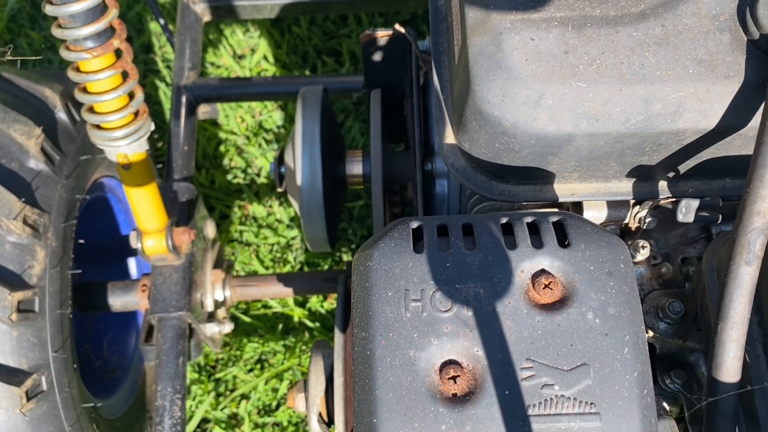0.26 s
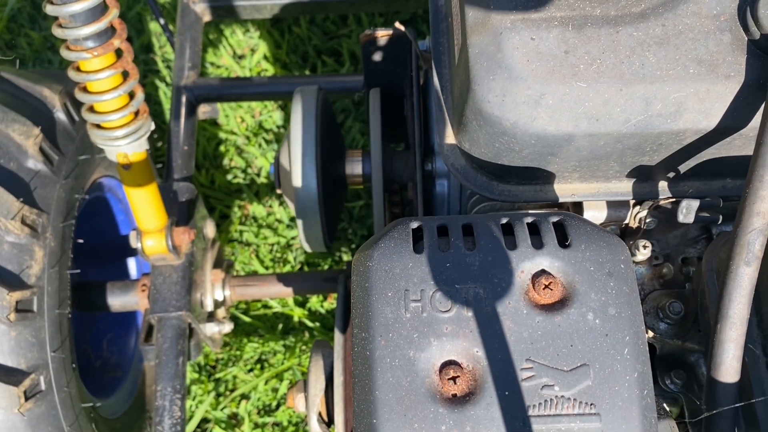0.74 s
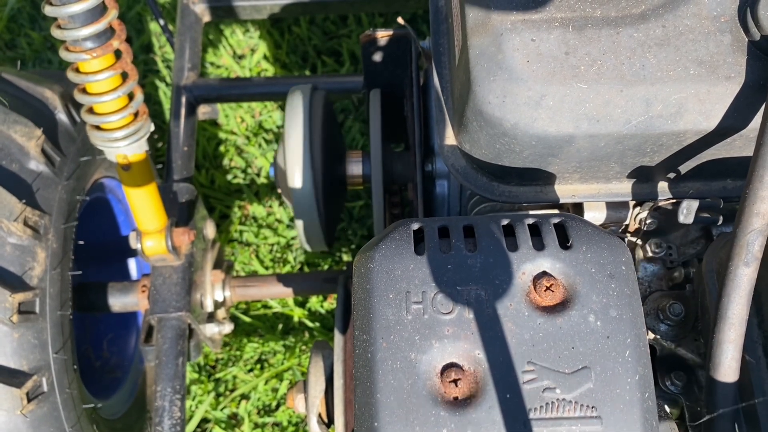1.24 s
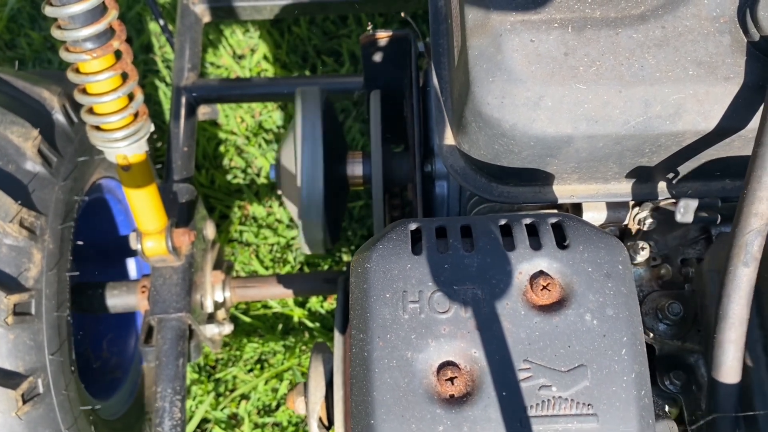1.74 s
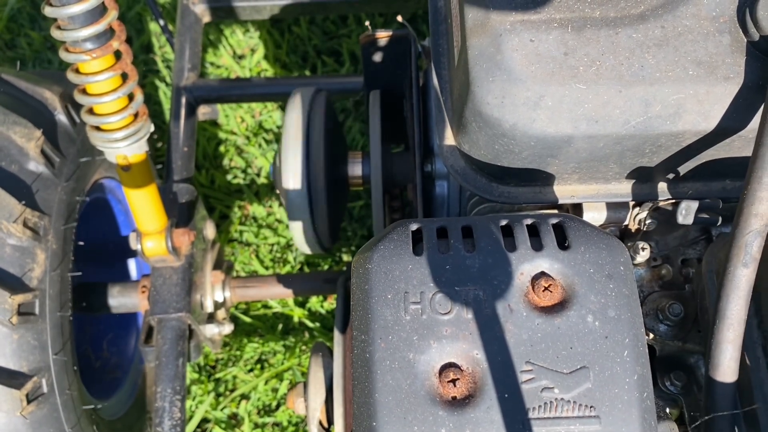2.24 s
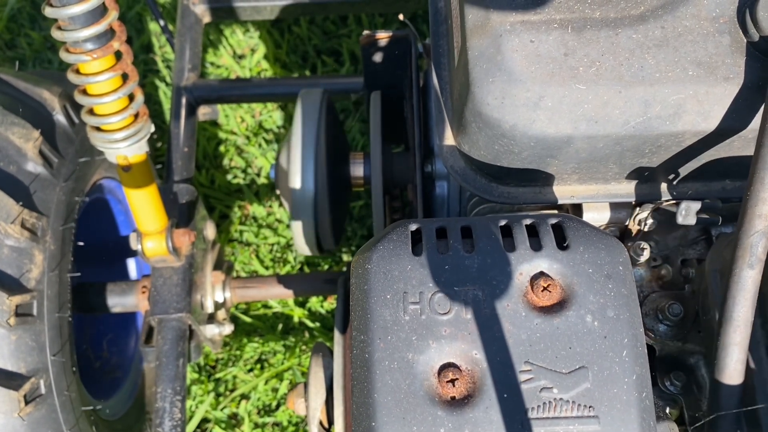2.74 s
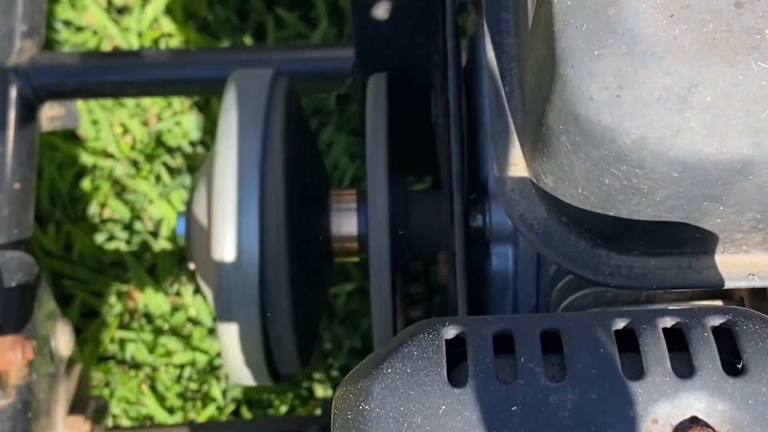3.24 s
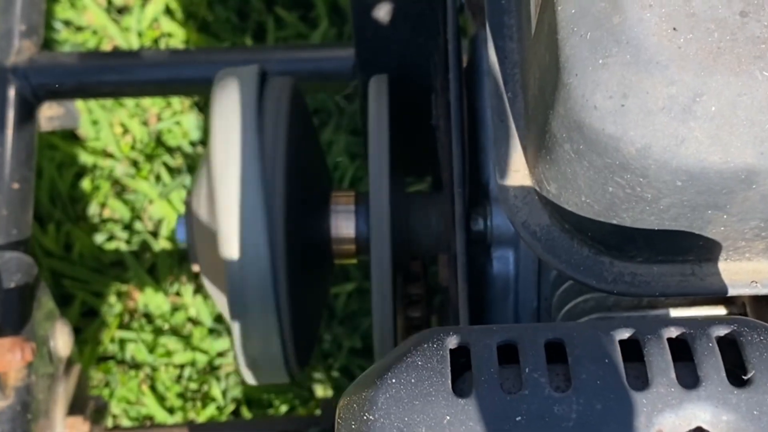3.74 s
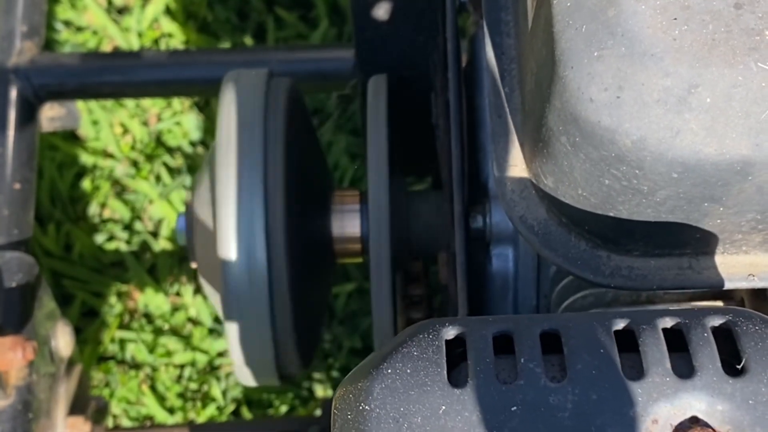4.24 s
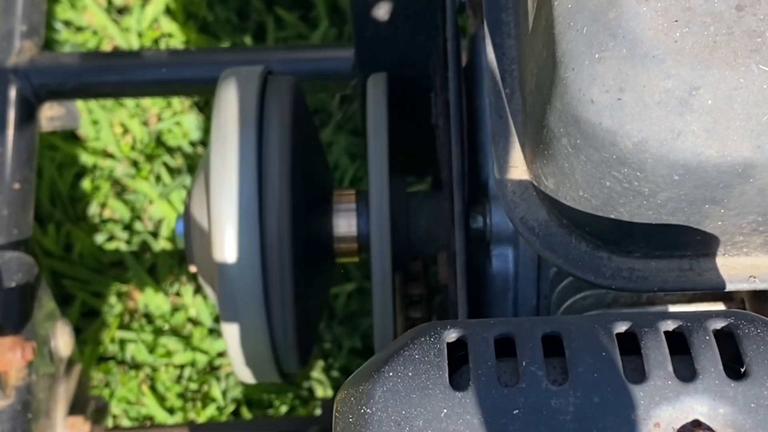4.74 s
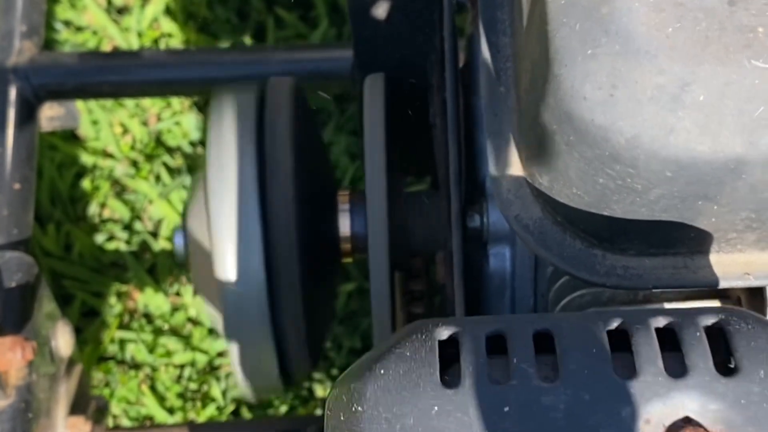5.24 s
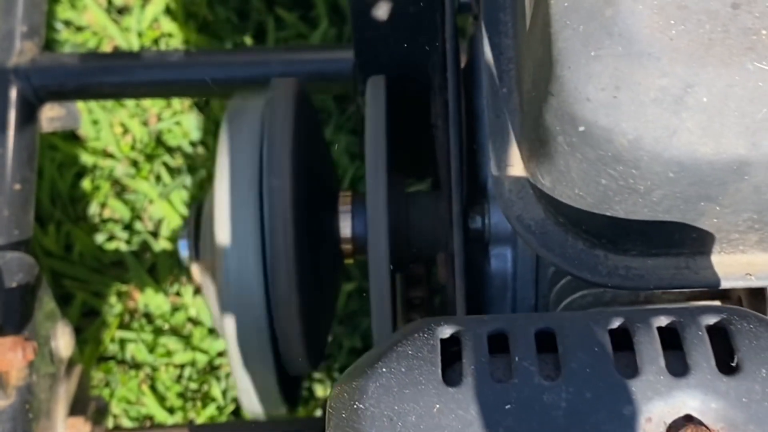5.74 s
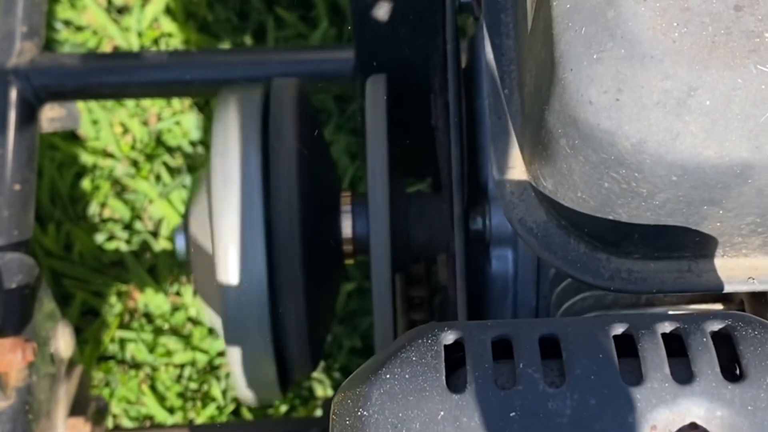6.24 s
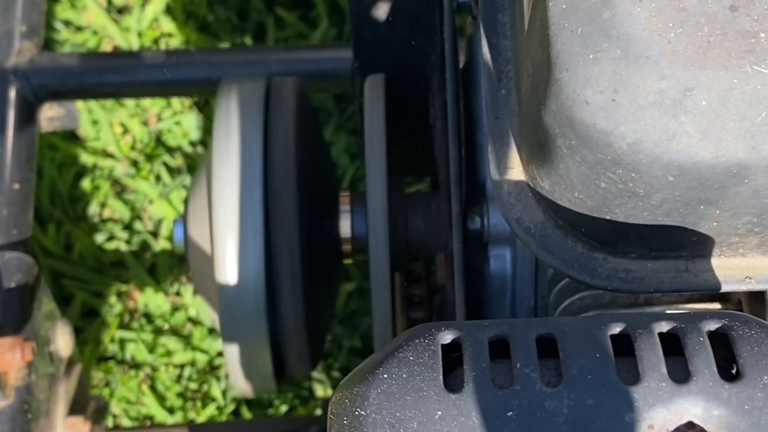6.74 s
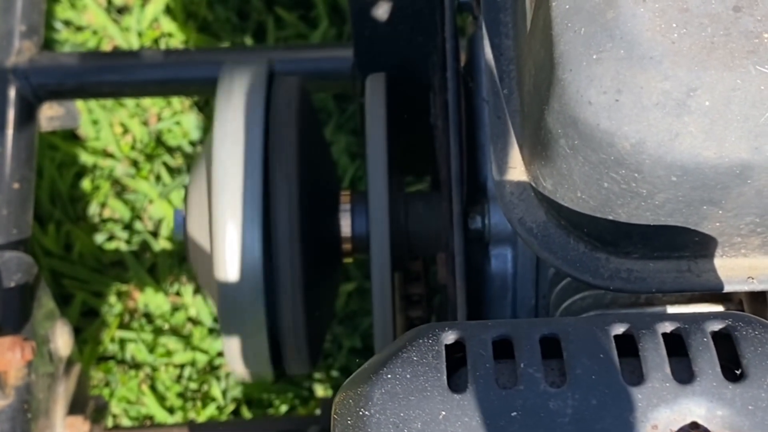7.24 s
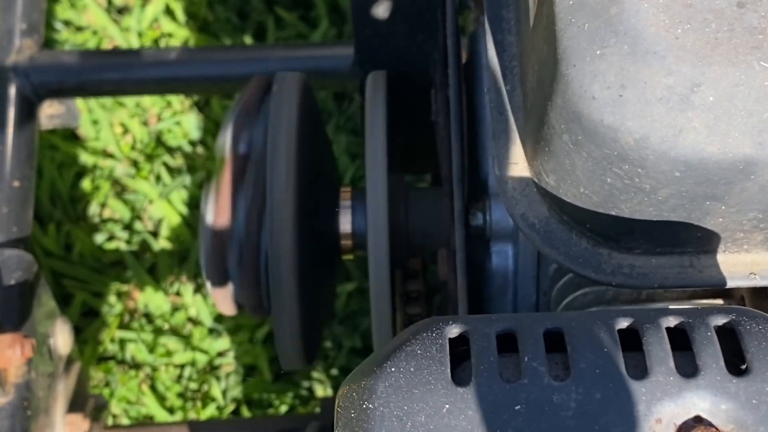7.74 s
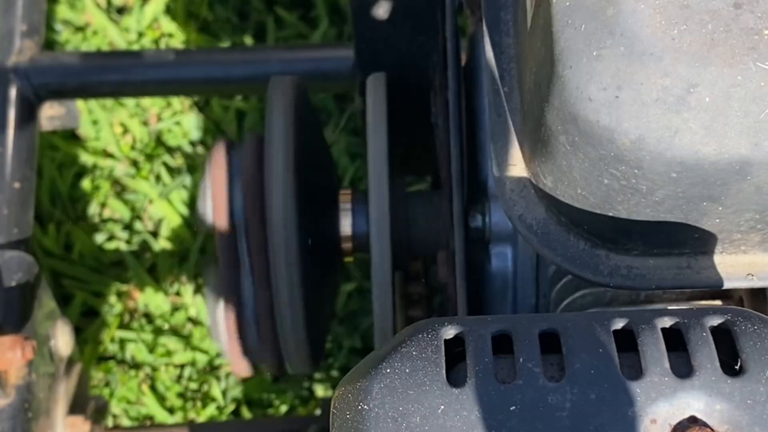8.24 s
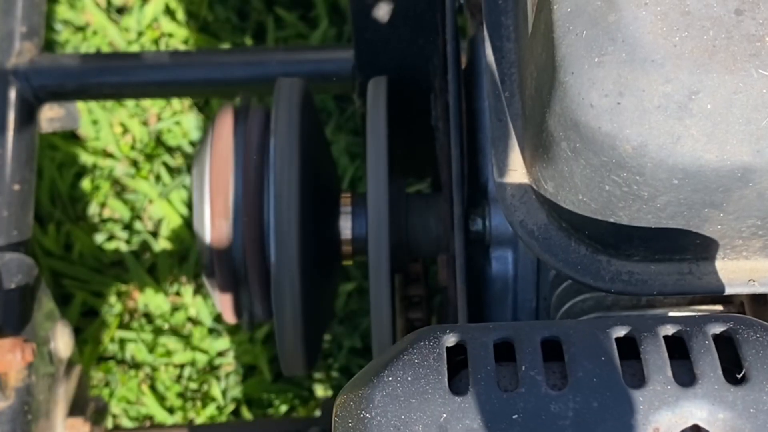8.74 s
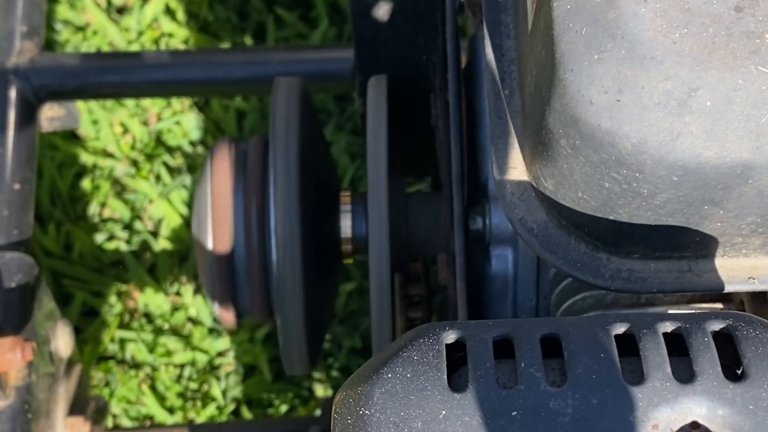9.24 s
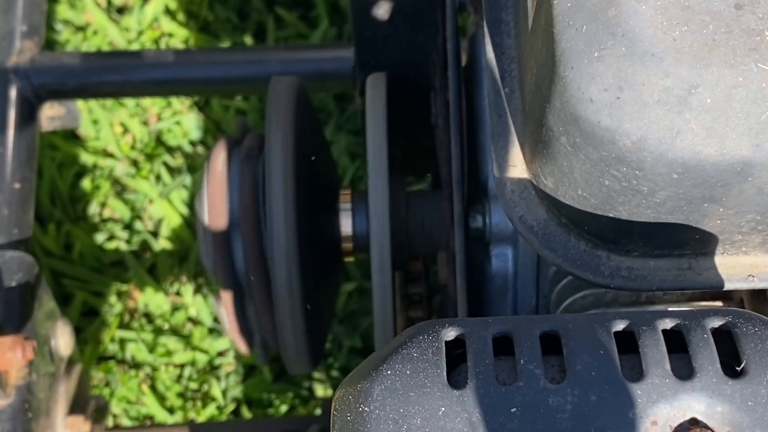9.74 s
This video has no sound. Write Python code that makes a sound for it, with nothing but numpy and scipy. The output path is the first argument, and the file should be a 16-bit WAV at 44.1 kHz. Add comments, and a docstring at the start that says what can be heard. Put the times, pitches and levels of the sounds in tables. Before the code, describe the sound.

Close beside a small single-cylinder engine outdoors, dull valve clatter and low gas thumps run throughout. Uneven barks and pops lift it into several brief surges, each sliding down as a rough drone and growl. Around five seconds the clutch crashes and scrapes; at six a cluster of hollow knocks rattles. A final rev near seven and a half brings squealing steel, then a lumpy, quieter idle. Dry stereo, slightly stronger left.

```python
"""Go-kart engine idle and surges

A small four-stroke single idles, missing many firings; several times it runs up to speed and coasts back.
Gas: swept pulses from the valves and firings, filtered turbulence, low orders that merge into a drone.
Clutch on the crank end: filtered noise bursts for clatter, rattle and knocks, damped or wavering tones for
ringing, squeal and growl. One crank-speed curve times the cyclic layers; tables place the single events."""
import sys
import numpy as np
from scipy import signal
from scipy.fft import rfft, irfft, next_fast_len
from scipy.io import wavfile
from scipy.ndimage import uniform_filter1d

SR = 44100
rng = np.random.default_rng(int(sys.argv[2]) if len(sys.argv) > 2 else 0)


def transcribe(u):
    """Save the signal u as a 16-bit wav file named by the first command-line argument.

    u: samples, shape (n,) or (channels, n), limited to [-1, 1]; the rate is SR.
    q: integer samples, one column per channel.
    """
    v = np.clip(np.atleast_2d(u).T, -1, 1)
    q = np.round(v * 32767).astype(np.int16)
    wavfile.write(sys.argv[1], SR, q)


N = 440559
T = np.arange(N) / SR

# Event and spectrum levels are relative; each layer adds its own trim.

# Crank speed in working cycles (two turns) per second. Surges: start t/s, run-up/s, top speed f/Hz
SURGES = [(.66, .07, 18.33), (1.02, .09, 18.39), (1.19, .14, 26.95), (2.46, .24, 25.67), (3.63, .16, 25.86),
          (4.74, .27, 29.78), (7.29, .22, 24.31)]
COLD_IDLE_HZ, IDLE_HZ, FIRST_CYCLE_S = 14.218, 14.565, .063
# Coast: time to lose the last 1 Hz of excess speed, power law of the decay
COAST_S, COAST_POWER = 1.192, 3.2
# Dragging clutch lets go at this speed; softness; extra level of thump, gas, clatter, rattle
RELEASE_HZ, RELEASE_WIDTH_HZ, DRAG_DB = 20.3, 0.14, [1.5, -0.5, 1.5, 4]
# Shudder ahead of release: speed, width of its range, extra rattle
SHUDDER_HZ, SHUDDER_WIDTH_HZ, SHUDDER_DB = 21.23, 1, 3

# Slow drift of the layers at idle speed: t/s, thump level/dB, gas level/dB, clatter level/dB, rattle level/dB
LAYER_DRIFT = [(0, -24, -25.5, -29.5, -49), (.6, -24, -28.5, -29, -46), (.88, -25.5, -30, -34.5, -51.5),
               (1.15, -20.5, -27, -29.5, -50), (1.45, -29.5, -32, -34, -51.5), (2.1, -25.5, -29, -34, -52),
               (2.9, -26, -28, -31.5, -48.5), (4.5, -25, -29.5, -33, -51.5), (4.98, -23.5, -29, -28.5, -45),
               (5.148, -33.5, -28.5, -30, -42), (5.75, -29, -30.5, -32, -46), (6.4, -33, -33, -36.5, -52),
               (7.099, -29.5, -32.5, -35.5, -50.5), (7.7, -26, -27.5, -33, -51),
               (8.2, -28.5, -31, -36.5, -55.5), (8.648, -30, -34, -38, -54.5),
               (9.99, -29.5, -36, -37.5, -52.5)]
# Change of thump, gas, clatter, rattle with speed: slope/(dB/Hz)
SPEED_SLOPE_DB_PER_HZ = [-0.093, 0.17, -0.2, 0.14]
THUMP, GAS, CLATTER, RATTLE = range(4)

# Runs of firings, and two single clutch crashes (5.04, 7.56 s):
# first t/s, last t/s, spacing/cycles, exhaust bark level/dB, clutch clash level/dB
FIRINGS_AND_CRASHES = [(.113, .538, 2, -12, -29), (0.68, .68, 1, -7, -16), (.742, .742, 1, -14.5, -28),
                       (0.971, .972, 1, -14, -30), (1.194, 1.29, 1, -8.5, -17.5),
                       (2.544, 2.636, 1, -9.5, -18.5), (3.645, 3.742, 1, -8, -18),
                       (4.801, 4.97, 1, -10, -18.5), (5.042, 5.044, 1, -30, -19),
                       (7.382, 7.482, 1, -15.5, -20), (7.56, 7.559, 1, -15.5, -20),
                       (8.8, 9.884, 2, -21, -41)]
# Weakening within a run, dB per Hz of speed gained
BARK_SAG_DB_PER_HZ, CLASH_SAG_DB_PER_HZ = 1.2, 0.25
# Weak firings that only chuff: t/s
CHUFFS_S = [2.201, 2.375, 2.495, 6.346, 6.467, 6.594, 6.722, 6.852, 6.981, 7.114, 7.249, 8.307, 8.424, 8.61]
# Single gas pops, mostly of missing cycles: t/s, level/dB
POPS = [(0.339, -13), (0.591, -8), (7.296, -14), (0.662, -10), (0.921, -13), (1.087, -8), (1.147, -12),
        (3.37, -11.5), (8.307, -13.5)]
# Pops ahead of the first two firings of a run of three or more, one cycle apart
POP_LEAD_S, POP_DB = 0.01, -8
# Coasting thumps that drop out: t/s
DROPOUTS_S = [1.765, 2.995, 3.135, 4.055, 4.19, 5.31, 5.435, 5.57, 5.66, 5.76]
# Gas strokes: level/dB, rise/s, length/s
BLOW, SUCK, GULP = (0, 0.0025, 0.036), (-0.15, 0.0046, 0.033), (-3.5, 0.0044, 0.021)
# Their pitch sweep: start above the end pitch, end pitch, time for the excess to halve
SWEEP_HZ, SWEEP_END_HZ, SWEEP_S = 800, 33, .00103
# Drone orders at speed: multiple of the cycle rate/1, level/dB
DRONE = [(2, 1), (3, 3.5), (4, 3), (5, -11)]

# Clutch against its stop: t/s, steel crack level/dB, hollow drum level/dB
KNOCKS = [(0.765, -15, -26), (1.091, -19.5, -22), (1.1483, -23, -21), (2.109, -11.5, -29),
          (2.378, -38, -10), (3.477, -9.5, -13), (4.581, -8, -27), (5.028, -46, -49.5), (6.015, -24, -10),
          (6.041, -27, -5), (6.071, -32, -6.5), (6.092, -21, -3), (6.119, -26, -6), (6.146, -16.5, -6),
          (6.173, -41, -9), (6.275, -13, -15), (7.621, -14, -27), (8.2503, -24.5, -25), (8.303, -19, -11.5)]
# Steel squeals: t/s, leading pitch f/Hz, length/s, level/dB
SQUEALS = [(0.703, 5200, 0.05, -21.5), (0.767, 4980, 0.02, -17), (7.445, 5020, 0.02, -13.5),
           (7.471, 4900, 0.034, -27), (7.5, 4960, 0.046, -23.5), (7.547, 5100, 0.047, -26),
           (7.584, 5010, 0.026, -26), (7.623, 3340, 0.052, -23), (7.618, 6040, .06, -30.5),
           (7.625, 5550, 0.051, -25), (7.663, 5950, 0.054, -27)]
# Steel modes that ring along with a squeal: f/Hz, level/dB
SQUEAL_MODES = [(4950, -13), (6065, -9), (7540, -11.5), (10560, -10), (14640, -11)]
# Scraping spells, clatter and rattle raised: middle t/s, half length/s, extra level/dB
SCRAPES = [(5.07, 0.028, 6), (6.148, 0.15, 4.5), (7.647, 0.11, 2)]
# Contacts in each working cycle: share of the cycle/1, level/dB
CONTACTS = [(.05, -1), (0.189, -16.5), (0.558, -3.5), (0.689, -8), (.9, -14)]
# Slipping angle of the once-a-turn clutch strike: t/s, share of the cycle/1
STRIKE_ANGLE = [(0, 0.11), (4.95, 0.23), (5.05, 0.39), (5.5, 0.45), (5.8, 0.23), (6.1, 0.2)]
# Clutch lag behind the crank: large at 5.05 s, nearly gone at 5.33 s, then settling at a small slip:
# t/s, lag f/Hz (cycles per second)
CLUTCH_LAG = [(4.8, 0), (5.05, 9), (5.33, 0.47), (5.7, 0.8), (6, 1.5)]

# Resonances of engine case and clutch: f/Hz, width/Hz, lift level/dB
CASE = [(827, 112, 8.5), (944, 80, 9), (1134, 105, 9), (1360, 8.8, 7.5), (1840, 105, 7), (1991, 45, 7.5),
        (2457, 36, 8), (2970, 100, 2.5), (3335, 13, 2), (3800, 54, 8), (4380, 81, 5.5), (4760, 53, 5),
        (5260, 18, 6.5), (7130, 61, 5)]
# Resonances of the clutch drum: f/Hz, width/Hz, lift level/dB
DRUM = [(675, 35, 12.5), (816, 8.1, 22.5), (1015, 70, 6.3), (1780, 80, 9.1), (3635, 140, 15),
        (4820, 92, 18), (6550, 140, 20)]
# Treble resonances and one dip of the clutch's thin steel: f/Hz, width/Hz, lift or cut/dB
THIN_STEEL = [(5700, 71, -13), (6150, 49, 1.5), (6780, 60, 8.5), (7630, 90, 2), (9900, 61, 12),
              (10600, 60, 7)]
# Resonances and one dip of the gas in the pipes: f/Hz, width/Hz, lift or cut/dB
PIPES = [(232, 90, 5.5), (371, 31, 1), (440, 30, -2.5), (643, 41, 6.5)]
# Modes of the silencer's sheet-metal shell: f/Hz, level/dB, t60/s
SHELL_MODES = [(384, -15.5, 0.15), (943, 0, .08), (1104, 0.5, 0.18), (1174, 1, 0.14)]
# Modes of the crankcase: f/Hz, level/dB, t60/s
CRANKCASE_MODES = [(375, 0.5, 0.055), (1846, -7, .06), (1970, -2, .08), (2450, 7, 0.044), (2760, -4, 0.055),
                   (3870, 5, 0.037), (4250, -4, 0.037)]

# Spectrum of gas through the valves: f/Hz, level/dB
RUSH_SPECTRUM = [(40, -18.5), (110, 5.5), (230, -1), (390, 0), (560, -9), (850, -11.5), (1300, -21.5),
                 (3000, -29)]
# Spectrum of the dull clatter: f/Hz, level/dB
CLATTER_SPECTRUM = [(150, -6.5), (500, 4), (900, 1.5), (1500, 3.5), (2300, 1), (3500, -2), (5500, -13),
                    (8000, -22), (11000, -41), (16000, -17)]
# Spectrum of the bright rattle: f/Hz, level/dB
RATTLE_SPECTRUM = [(1500, -15), (4000, 12), (7500, 8.5), (11000, 8.5), (13000, 7), (16000, -11)]
# Spectrum of the exhaust bark: f/Hz, level/dB
BARK_SPECTRUM = [(90, 7.5), (280, -4), (550, -13.5), (1000, 8.5), (1400, -2.5), (2500, -4), (6000, -37)]
# Spectrum of the jolted clutch: f/Hz, level/dB
CLASH_SPECTRUM = [(400, -25), (1500, 7.5), (3500, 7.5), (5800, 3.5), (8000, 3), (11000, 5), (16000, -0.5)]
# Spectrum of a knock's steel crack: f/Hz, level/dB
CRACK_SPECTRUM = [(100, -9), (450, 8.5), (1500, -4.5), (3500, 0.5), (6500, -4.5), (9000, 1), (12000, -2),
                  (16000, -12)]
# Spectrum of the hollow drum note: f/Hz, level/dB
HOLLOW_SPECTRUM = [(150, -8), (500, -17), (850, 3.5), (1400, -5), (3000, -9), (8000, -21.5)]
# Spectrum of the shuddering clutch's thin hiss: f/Hz, level/dB
SIZZLE_SPECTRUM = [(6000, -30), (9500, -10), (11300, 19), (13000, -7), (15000, -12), (16000, -18)]
# Spectrum of the roar after a hard firing: f/Hz, level/dB
ROAR_SPECTRUM = [(100, -23.5), (250, 2), (400, 2), (700, -3.5), (1100, -8), (2500, -36.5)]
# Level of each growl harmonic by its pitch: f/Hz, level/dB
GROWL_SPECTRUM = [(140, -7.5), (225, 2.5), (290, 0), (365, 0.5), (450, 1.5), (560, -4.5), (800, -6)]

# Microphone pair, left minus right: f/Hz, level/dB
BALANCE = [(60, .7), (150, 1.5), (500, 1.9), (1000, 2.2), (1800, 3.6), (3300, 3), (5000, 4.2), (6000, 3.8),
           (6600, .3), (16000, 0)]
# Microphone pair, lead of left: f/Hz, phase/rad
LEFT_LEAD = [(0, -.15), (700, -.12), (2000, .35), (2700, .25), (3100, .65), (3550, .05), (7500, 0),
             (8400, -2.8), (9600, -3.4), (10400, -5.8), (11600, -6.5), (12600, -9.1), (13800, -9.6),
             (14600, -12.3), (16500, -12.7)]
EDGE_HZ = 15850


def amp(db):
    """Decibels to gain."""
    return 10 ** (np.asarray(db) / 20)


def unit(x):
    """Scales to rms 1."""
    return x / np.sqrt(np.mean(x ** 2) + 1e-20)


def read(points, hz):
    """Reads a spectrum on a log-frequency axis."""
    f, value = np.transpose(points)
    return np.interp(np.log(hz + 1), np.log(f + 1), value)


def clicks(times_s, sizes):
    """A train of single impulses."""
    out = np.zeros(N)
    inside = (times_s >= 0) & (times_s < T[-1])
    np.add.at(out, (times_s[inside] * SR).astype(int), sizes[inside])
    return out


def convolve(x, response):
    """Passes one or two channels through a response."""
    return signal.oaconvolve(np.atleast_2d(x), response[None], axes=1)[:, :N]


def bursts(times_s, sizes, rise_s, decay_s):
    """An envelope that swells and dies away at each event."""
    t = T[:SR // 5]
    shape = (1 - np.exp(-(t / rise_s) ** 2)) * np.exp(-t / decay_s)
    return convolve(clicks(times_s, sizes), shape / shape.max())


def ring(modes):
    """Response of a set of damped modes."""
    t = T[:SR // 3]
    return sum(amp(db - 60 * t / t60_s) * np.sin(2 * np.pi * hz * t) for hz, db, t60_s in modes)


def colour(x, spectrum, peaks=(), size=8192):
    """Causal minimum-phase filter of unit energy: a broad spectrum with resonances on it."""
    hz = abs(np.fft.fftfreq(size, 1 / SR))
    lifts_db = sum(lift / (1 + (2 * (hz - f) / width) ** 2) for f, width, lift in peaks)
    log_gain = np.log(amp(read(spectrum, hz) + lifts_db))
    response = np.fft.ifft(np.exp(np.conj(signal.hilbert(log_gain)))).real[:size // 2]
    return convolve(x, response / np.linalg.norm(response))


def grit(spread_db, apart):
    """Tiny impacts of uneven size, mostly common to both microphones."""
    common, left, right = rng.standard_normal((3, N))
    uneven = np.clip(rng.standard_normal(N // 16 + 1), -2.5, 2.5)
    sizes = amp(spread_db * uneven).repeat(16)[:N]
    return unit((common + apart * np.array([left, right])) * sizes)


def waver(count=100):
    """A slow random curve of about unit size, drawn through count points."""
    return np.interp(T, np.linspace(0, T[-1], count), rng.standard_normal(count))


def chirp(start_hz, end_hz, fall_s, peak_s, order=2):
    """A swell of gas whose pitch drops as its pressure is spent."""
    t = T[:SR // 20]
    hz = end_hz + (start_hz - end_hz) * np.exp(-(t / fall_s) ** order)
    swell = (t / peak_s) ** 2 * np.exp(1 - (t / peak_s) ** 2)
    return swell * np.sin(2 * np.pi * np.cumsum(hz) / SR)


def stroke(db, rise_s, length_s):
    """One pulse of gas: a thump that sweeps down from a chirp to a low note."""
    t = T[:SR // 12]
    turns = SWEEP_END_HZ * t + SWEEP_HZ * SWEEP_S * np.log(1 + t / SWEEP_S)
    envelope = (1 - np.exp(-t / rise_s)) * np.exp(-(t / length_s) ** 4)
    return -amp(db) * envelope * np.cos(2 * np.pi * turns)


def crank():
    """Time, speed and completed cycles: surges ramp up, then friction takes a power-law coast to idle."""
    t = np.arange(-300, 10300) / 1000
    hz = np.full(len(t), COLD_IDLE_HZ)
    for start_s, run_up_s, top_hz in SURGES:
        excess_hz = top_hz - IDLE_HZ
        to_idle_s = COAST_S * excess_hz ** (1 / COAST_POWER)
        left = np.clip(1 - (t - start_s - run_up_s) / to_idle_s, 0, 1)
        coast_hz = IDLE_HZ + excess_hz * left ** COAST_POWER
        hz = hz + (coast_hz - hz) * np.clip((t - start_s) / run_up_s, 0, 1)
    cycles = np.cumsum(hz) * (t[1] - t[0])
    return t, hz, cycles - np.interp(FIRST_CYCLE_S, t, cycles)


def speed(times_s):
    """Working cycles per second at the given moments."""
    t, hz, cycles = crank()
    return np.interp(times_s, t, hz)


def crank_cycles():
    """Working cycles completed at each sample."""
    t, hz, cycles = crank()
    return np.interp(T, t, cycles)


def cycle_times(share):
    """Moments at which the crank passes a given point of its working cycle."""
    t, hz, cycles = crank()
    return np.interp(np.arange(-2, int(cycles[-1]) - 1) + share, cycles, t)


def firing_runs():
    """For each table row, events of (t/s, bark/dB, clash/dB): within a run they come round with the crank."""
    t, hz, cycles = crank()
    runs = []
    for first_s, last_s, step, bark_db, clash_db in FIRINGS_AND_CRASHES:
        a, b = np.interp([first_s, last_s], t, cycles)
        count = round((b - a) / round(step)) + 1
        s = np.interp(np.linspace(a, b, count), cycles, t)
        gained_hz = speed(s) - speed(first_s)
        runs.append(np.column_stack([s, bark_db - BARK_SAG_DB_PER_HZ * gained_hz,
                                     clash_db - CLASH_SAG_DB_PER_HZ * gained_hz]))
    return runs


def racing(idle_hz=17, racing_hz=24):
    """Engine speed, from 0 near idle to 1 at racing speed."""
    return np.clip((speed(T) - idle_hz) / (racing_hz - idle_hz), 0, 1)


def merged(apart_hz=20, merged_hz=22.7):
    """1 while the thumps run together into a hum, 0 while they are heard apart."""
    return np.clip((speed(T) - apart_hz) / (merged_hz - apart_hz), 0, 1)


def dragging():
    """Near 1 while the coasting engine still drags the clutch, 0 otherwise."""
    hz = speed(T)
    coasting = uniform_filter1d((np.gradient(hz) < 0) * 1., size=882)
    return coasting * (1 + np.tanh((hz - RELEASE_HZ) / RELEASE_WIDTH_HZ)) / 2


def shudder():
    """Rattle gain as the coasting engine passes the speed that shakes the clutch."""
    near = np.exp(-((speed(T) - SHUDDER_HZ) / SHUDDER_WIDTH_HZ) ** 2)
    return amp(SHUDDER_DB * dragging() * near)


def scraping():
    """Gain that swells and falls with each spell of scraping."""
    return amp(sum(db * np.exp(-((T - s) / half_s) ** 2) for s, half_s, db in SCRAPES))


def dropouts(dip_db=-9, half_s=0.018):
    """Gain of the low thumps: it dips briefly at each dropout."""
    return amp(dip_db * sum(np.exp(-((T - s) / half_s) ** 4) for s in DROPOUTS_S))


def level(layer):
    """Gain of one running layer: slow drift, change with speed and drag of the clutch."""
    rows = np.array(LAYER_DRIFT)
    drift_db = np.interp(T, rows[:, 0], rows[:, layer + 1])
    by_speed_db = SPEED_SLOPE_DB_PER_HZ[layer] * (speed(T) - IDLE_HZ)
    return amp(drift_db + by_speed_db + DRAG_DB[layer] * dragging())


def drum_song(drum_db=-40):
    """While the clutch scrapes, contact noise keeps its drum ringing."""
    contact = grit(spread_db=3, apart=.3)
    return amp(drum_db) * colour((scraping() - 1) * contact, HOLLOW_SPECTRUM, DRUM, size=4096)


def crankcase(case_db=-39, slip_db=4):
    """The racing clutch keeps the crankcase modes ringing, louder where it lags the crank."""
    slipping = np.clip(np.interp(T, *np.transpose(CLUTCH_LAG)), 0, 1)
    ringing = unit(convolve(grit(spread_db=8.5, apart=0.21), ring(CRANKCASE_MODES)))
    return amp(case_db + slip_db * slipping) * racing() * ringing


def sizzle(sizzle_db=-33):
    """The shuddering clutch grazes its hub once a turn: thin bursts of hiss."""
    times = np.concatenate([cycle_times(0.11), cycle_times(0.51)])
    sizes = amp(4.3 * rng.standard_normal(len(times)))
    grazes = unit(bursts(times, sizes, rise_s=.0015, decay_s=0.0028))
    contact = grit(spread_db=2, apart=.5)
    return amp(sizzle_db) * (shudder() - 1) * colour(grazes * contact, SIZZLE_SPECTRUM)


def squeals(rise_s=0.0031, rough_rad=0.7, chatter_db=3):
    """Steel rubs on steel: one mode sings, others ring along, each with an unsteady, chattering grip."""
    t, out = T[:SR // 5], np.zeros(N)
    for s, lead_hz, length_s, db in SQUEALS:
        swell = (1 - np.exp(-(t / rise_s) ** 2)) * np.exp(-(t / length_s) ** 2)
        for hz, mode_db in [(lead_hz, 0)] + SQUEAL_MODES:
            slip, grip = unit(uniform_filter1d(rng.standard_normal((2, len(t))), size=260))
            gain = amp(db + mode_db + chatter_db * grip)
            tone = gain * np.sin(2 * np.pi * hz * t + rough_rad * slip)
            out[round(s * SR):][:len(t)] += swell * tone
    return out


def knocks():
    """The clutch chatters for a few milliseconds against its stop and its drum sounds."""
    s, crack_db, drum_db = np.transpose(KNOCKS)
    crack = bursts(s, amp(crack_db - 1.5), rise_s=0.00034, decay_s=0.0052) * grit(spread_db=-5.5, apart=0.28)
    drum = bursts(s, amp(drum_db - 11.5), rise_s=0.0022, decay_s=0.01) * grit(spread_db=1, apart=0.11)
    return colour(crack, CRACK_SPECTRUM, CASE) + colour(drum, HOLLOW_SPECTRUM, DRUM)


def clatter():
    """Valve gear clatters near set crank angles; the wobbling clutch adds a bright rattle once a turn."""
    times = np.concatenate([cycle_times(share) for share, db in CONTACTS])
    contact_db = np.repeat([db for share, db in CONTACTS], len(times) // len(CONTACTS))
    late, strength = rng.standard_normal((len(times), 2)).T
    valve_sizes = amp(contact_db + 2.95 * strength)
    valves = unit(bursts(times + 0.0017 * late, valve_sizes, rise_s=0.0023, decay_s=0.023))

    turn = np.sort(np.concatenate([cycle_times(0), cycle_times(0.516)]))
    cycle_s = 2 * np.gradient(turn)
    turn = turn + cycle_s * np.interp(turn, *np.transpose(STRIKE_ANGLE))
    wobble_sizes = amp(1.84 * rng.standard_normal(len(turn)))
    wobble = unit(bursts(turn - .004, wobble_sizes, rise_s=0.001, decay_s=0.0072))

    dull_envelope = unit(0.59 + 0.38 * racing() + valves + 0.36 * wobble)
    dull = dull_envelope * grit(spread_db=1.5, apart=0.49)
    bright = unit(.15 + 0.78 * valves + wobble) * grit(spread_db=1, apart=0.1)
    rattle = amp(9.0) * level(RATTLE) * shudder() * colour(bright, RATTLE_SPECTRUM, THIN_STEEL)
    body = amp(4.5) * level(CLATTER) * colour(dull, CLATTER_SPECTRUM, CASE)
    return scraping() * body + scraping() ** .75 * rattle


def growl(count=11, waver_db=3.0, growl_db=-6.5, rough_rad=1.0, slip_db_per_hz=0.06):
    """Rough harmonics of the clutch's turn slide down as the engine coasts, louder where it lags the crank."""
    lag_hz = np.interp(T, *np.transpose(CLUTCH_LAG))
    turn_hz = 2 * (speed(T) - lag_hz)
    turns = np.cumsum(turn_hz) / SR
    orders = 0
    for k in 3 + np.arange(count):
        gain = amp(read(GROWL_SPECTRUM, k * turn_hz) + waver_db * waver(count=70))
        phase = 2 * np.pi * (k * turns + rng.random()) + rough_rad * waver(count=250)
        orders = orders + gain * np.cos(phase)
    return amp(growl_db + slip_db_per_hz * lag_hz) * racing() * level(GAS) * orders


def drone(drone_db=-2, waver_db=3.8, lean_rad=0.75):
    """Wavering low orders of the cycle rate stand out as the engine races, and slide down as it coasts."""
    turns = crank_cycles()
    orders = 0
    for k, db in DRONE:
        # phase lean: orders swell once a cycle, the higher ones first
        phase = 2 * np.pi * round(k) * (turns - .31) + lean_rad * (round(k) - 3) ** 2
        orders = orders - amp(db + waver_db * waver()) * np.cos(phase)
    return amp(drone_db) * merged() * dropouts() * level(THUMP) * orders


def gas_rush(turbulence_db=0.0, pulse_db=-11):
    """Each open valve passes a pressure step and a puff of turbulence."""
    times = np.concatenate([cycle_times(.92), cycle_times(0.2183)])
    puff_sizes = amp(2.8 * rng.standard_normal(len(times)))
    # steady flow under the puffs grows with speed: they run together
    puffs = unit(0.27 + 0.2 * racing() + bursts(times, puff_sizes, rise_s=0.0013, decay_s=0.0034))
    steps = unit(clicks(times, amp(rng.standard_normal(len(times)))))
    eddies = grit(spread_db=3, apart=.3)
    flow = amp(turbulence_db) * eddies * puffs + amp(pulse_db) * steps
    return level(GAS) * colour(flow, RUSH_SPECTRUM, PIPES)


def roar(roar_db=-1, rise_s=0.0024, decay_s=0.029):
    """Firings, and the two crashes, leave a rough roar in the pipes, scaled with the clash."""
    s, bark_db, clash_db = np.vstack(firing_runs()).T
    eddies = grit(spread_db=3, apart=.3)
    return colour(bursts(s, amp(clash_db + roar_db), rise_s, decay_s) * eddies, ROAR_SPECTRUM, PIPES)


def chuffs(chuff_db=-25):
    """A weak firing sends only a short, soft sweep down the pipe."""
    s = np.array(CHUFFS_S)
    sweep = chirp(start_hz=910, end_hz=220, fall_s=0.0048, peak_s=0.0036)
    return convolve(clicks(s, np.full(len(s), amp(chuff_db))), sweep)


def pops():
    """Brief gas pops whose pitch drops within a few cycles of the tone."""
    leading = [(s - POP_LEAD_S, POP_DB) for run, row in zip(firing_runs(), FIRINGS_AND_CRASHES)
               if round(row[2]) == 1 and len(run) > 2 for s in run[:2, 0]]
    s, db = np.transpose(POPS + leading)
    sweep = chirp(start_hz=854, end_hz=250, fall_s=0.00253, peak_s=0.0039)
    return convolve(clicks(s, amp(db - 2.5)), sweep)


def pumping(exhaust_share=.93, intake_lag=0.3263, uneven_db=1.3, merged_db=-8, fade=1.1, pump_db=3.5):
    """The exhaust valve blows out after a table event and sucks back after a miss; then the intake gulps."""
    exhaust = cycle_times(exhaust_share)
    period_s = np.gradient(exhaust)
    lit = np.concatenate([np.vstack(firing_runs())[:, 0] + 0.00373, CHUFFS_S]) + 0.003
    nearest = lit[abs(exhaust[:, None] - lit).argmin(1)]
    fired = abs(nearest - exhaust) < period_s / 2
    exhaust = np.where(fired, nearest, exhaust)
    sizes = amp(uneven_db * rng.standard_normal((len(exhaust), 2)))
    # at speed the cylinder has less time to suck back, and the intake stroke leads
    back_flow = ~fired * (period_s * IDLE_HZ) ** fade
    blown = convolve(clicks(exhaust, fired * sizes[:, 0]), stroke(*BLOW))
    sucked = convolve(clicks(exhaust, back_flow * sizes[:, 0]), stroke(*SUCK))
    gulped = convolve(clicks(exhaust + intake_lag * period_s, sizes[:, 1]), stroke(*GULP))
    highpass = signal.butter(3, 40, "highpass", fs=SR, output="sos")
    air = signal.sosfilt(highpass, blown + sucked + gulped)
    return amp(pump_db + merged_db * merged()) * dropouts() * level(THUMP) * unit(air)


def firings():
    """Each firing sweeps down the pipe, rings the silencer shell and jolts the clutch; crashes sound alike."""
    s, bark_db, clash_db = np.vstack(firing_runs()).T
    pipe = chirp(start_hz=1100, end_hz=170, fall_s=.0112, peak_s=.0098, order=4)
    sweep = convolve(clicks(s, amp(bark_db - 2)), pipe)
    shell = convolve(clicks(s + 0.0099, amp(bark_db - 10)), ring(SHELL_MODES))
    bark = bursts(s, amp(bark_db - 10.0), rise_s=0.00097, decay_s=0.04) * grit(spread_db=4.0, apart=0.19)
    impacts = grit(spread_db=3, apart=.4)
    clash = bursts(s - .002, amp(clash_db + 5.0), rise_s=0.0055, decay_s=0.012) * impacts
    return sweep + shell + colour(bark, BARK_SPECTRUM) + colour(clash, CLASH_SPECTRUM, CASE + THIN_STEEL)


def scene():
    """Sum of clutch and engine layers, without any room."""
    clutch = drum_song() + crankcase() + sizzle() + squeals() + knocks() + growl()
    engine = clatter() + drone() + gas_rush() + roar() + chuffs() + pops() + pumping() + firings()
    return clutch + engine


def record(dry):
    """The microphone pair favours the left and delays its top treble; then overload and the band limit."""
    size = next_fast_len(N + 4096)
    hz = np.fft.rfftfreq(size, 1 / SR)
    tilt = amp(read(BALANCE, hz) / 2)
    lead_rad = np.interp(hz, *np.transpose(LEFT_LEAD))
    ports = np.array([tilt * np.exp(1j * lead_rad), 1 / tilt])
    heard = np.clip(irfft(rfft(dry, size) * ports, size)[:, :N], -1, 1)
    lowpass = signal.firwin(511, EDGE_HZ, window=("kaiser", 9), fs=SR)
    return signal.oaconvolve(heard, lowpass[None], "same", axes=1)


dry = scene()
out = record(dry)
transcribe(out)
```